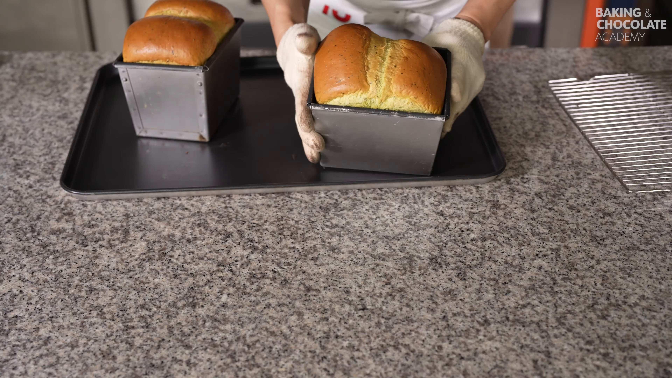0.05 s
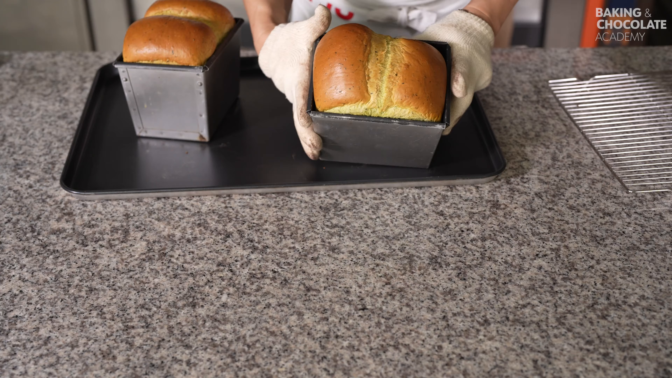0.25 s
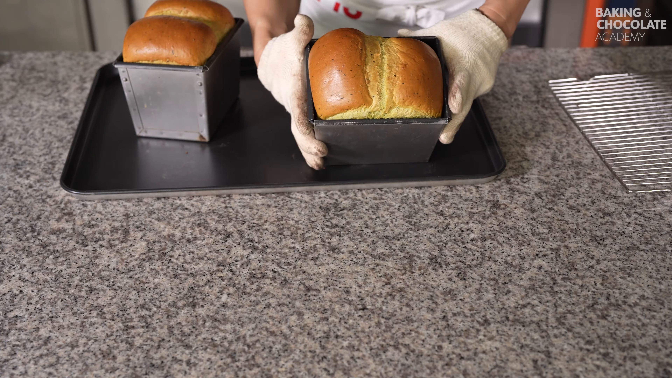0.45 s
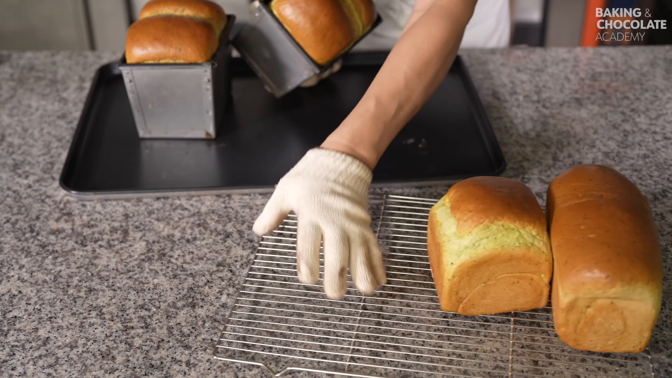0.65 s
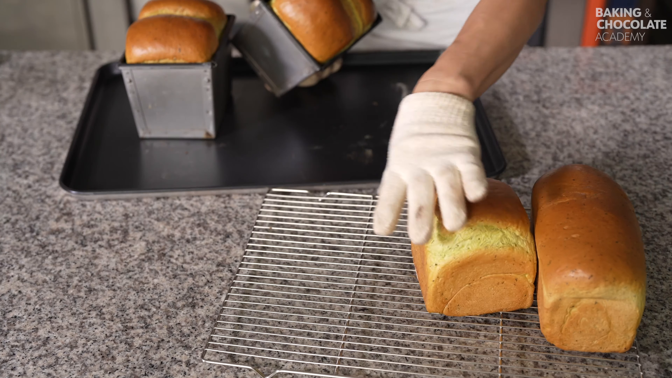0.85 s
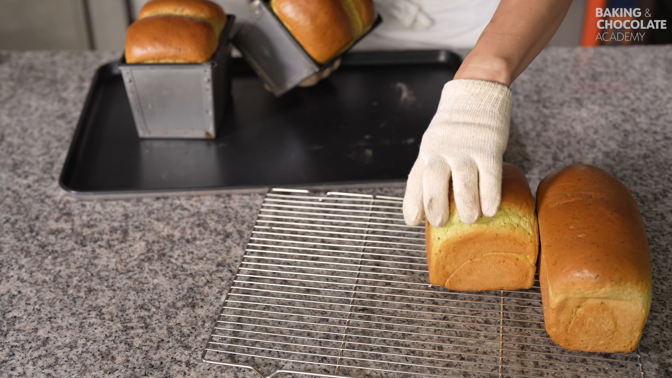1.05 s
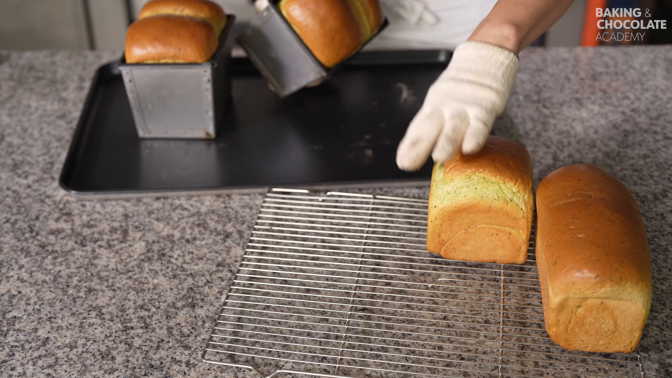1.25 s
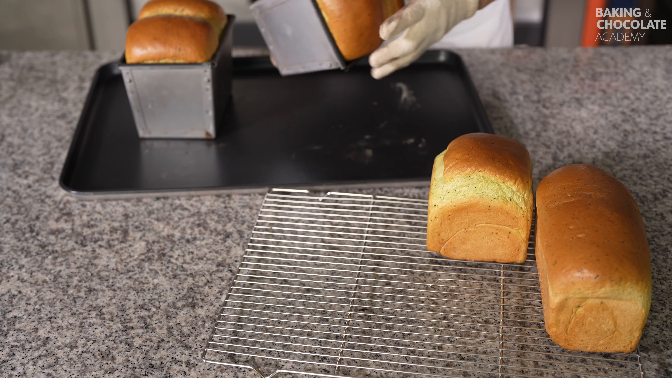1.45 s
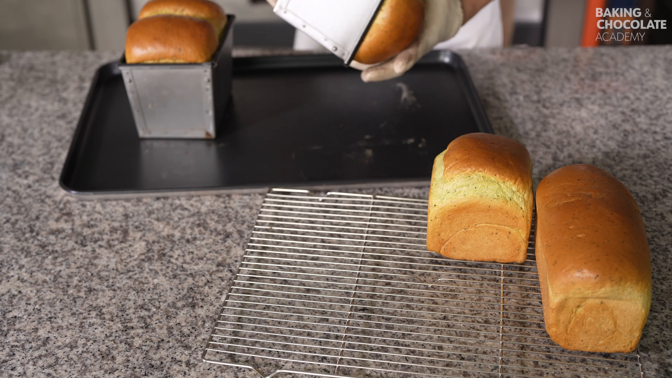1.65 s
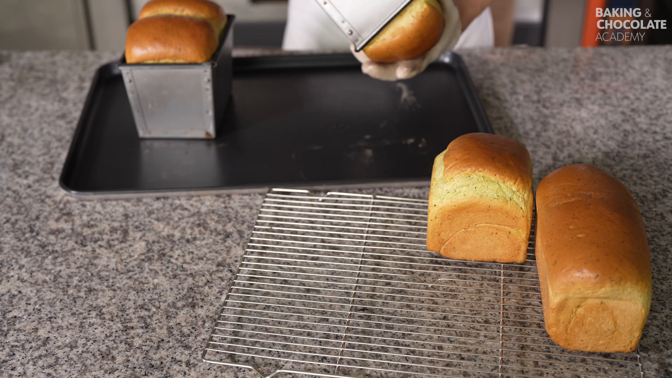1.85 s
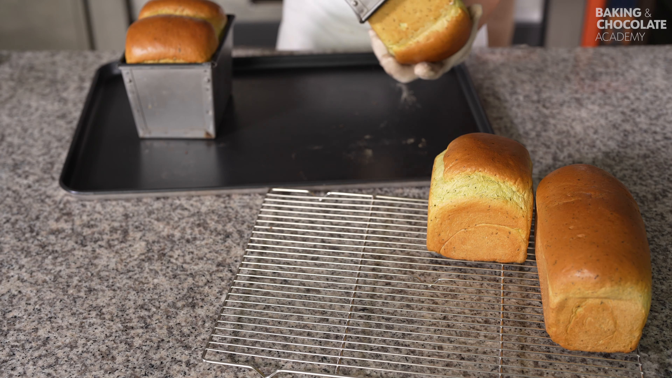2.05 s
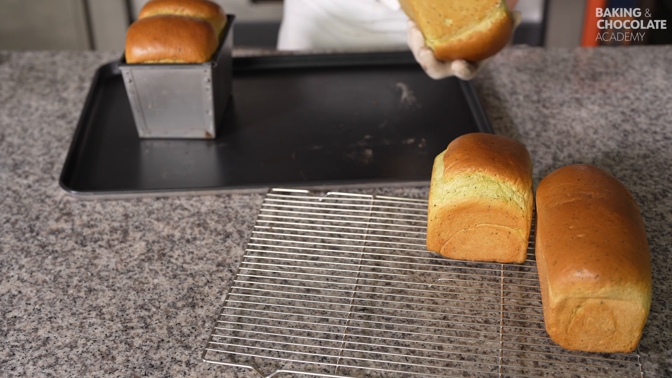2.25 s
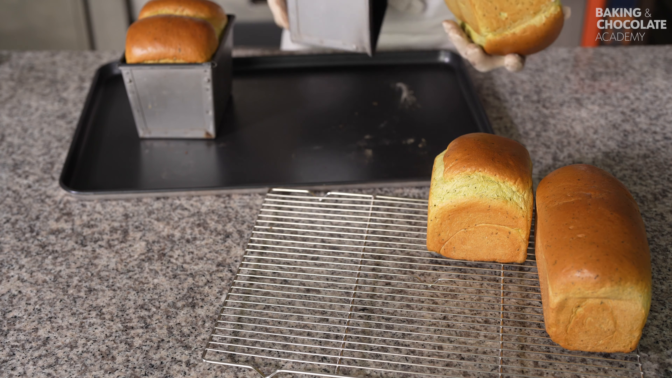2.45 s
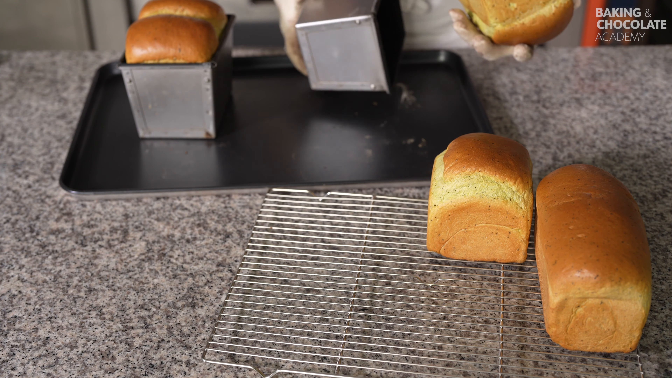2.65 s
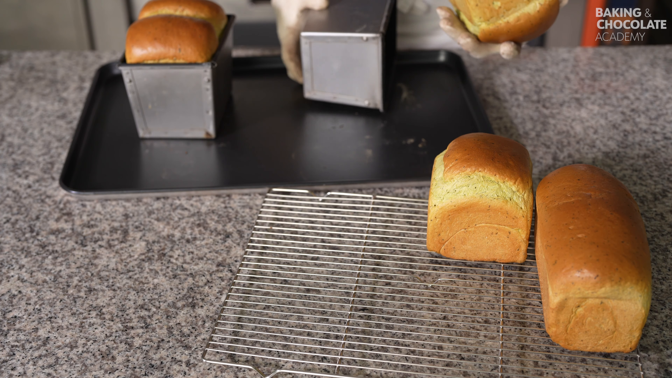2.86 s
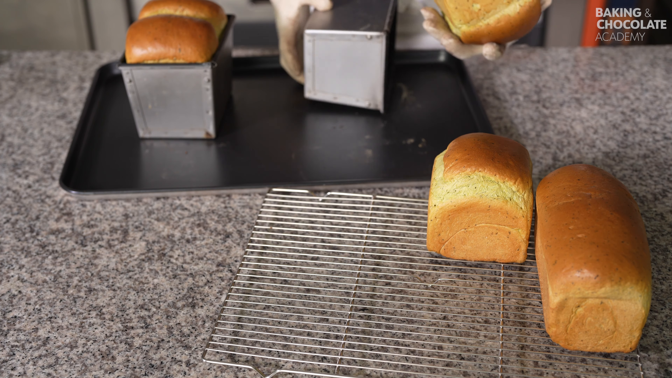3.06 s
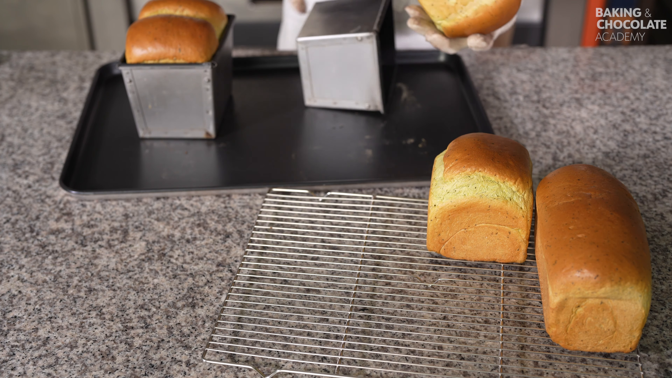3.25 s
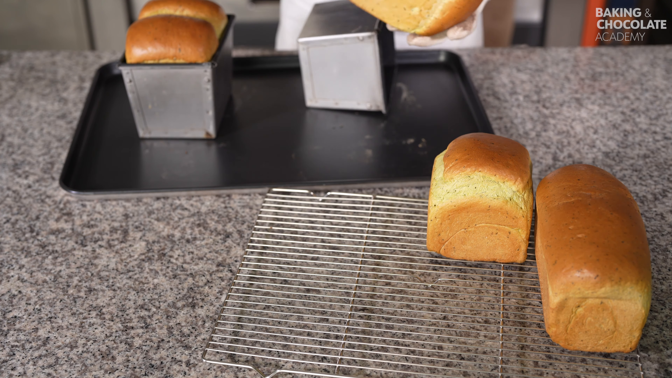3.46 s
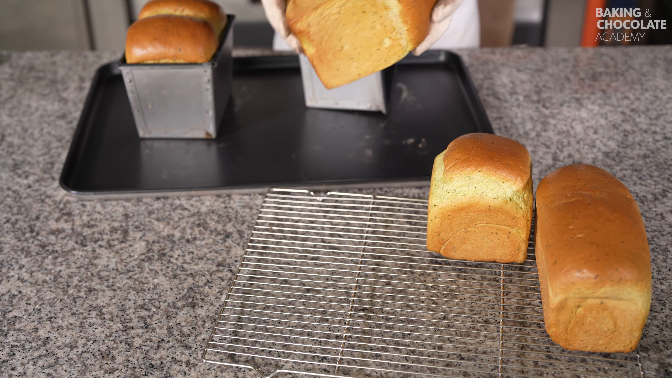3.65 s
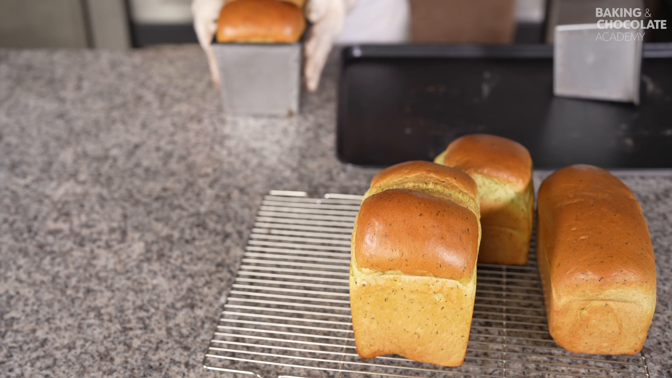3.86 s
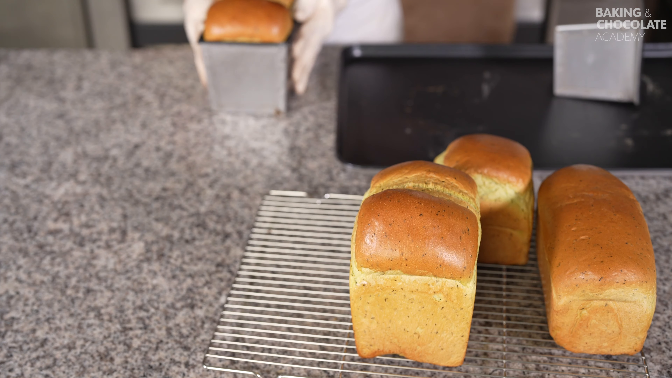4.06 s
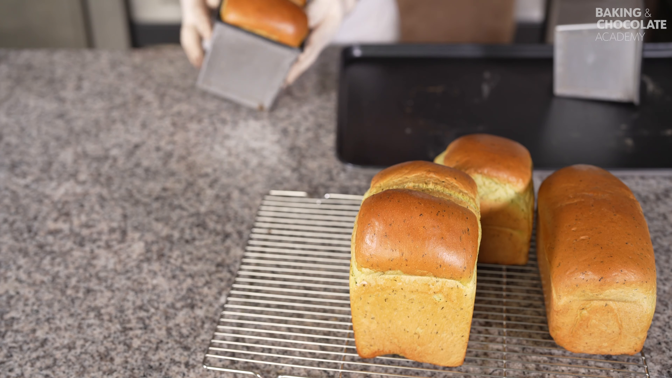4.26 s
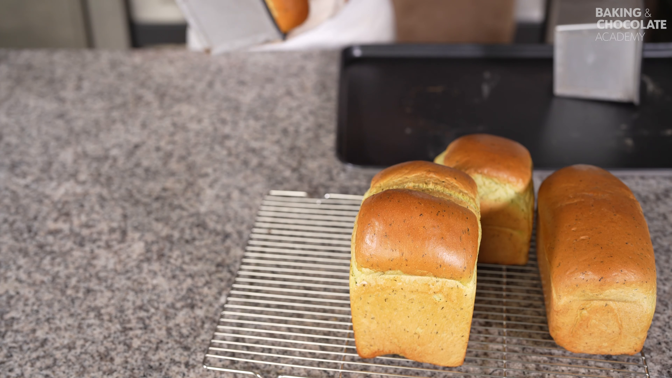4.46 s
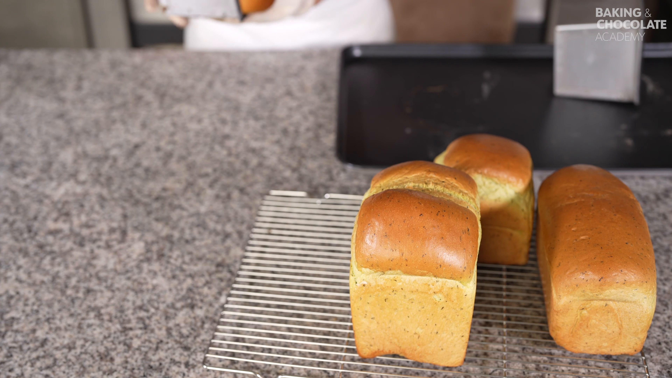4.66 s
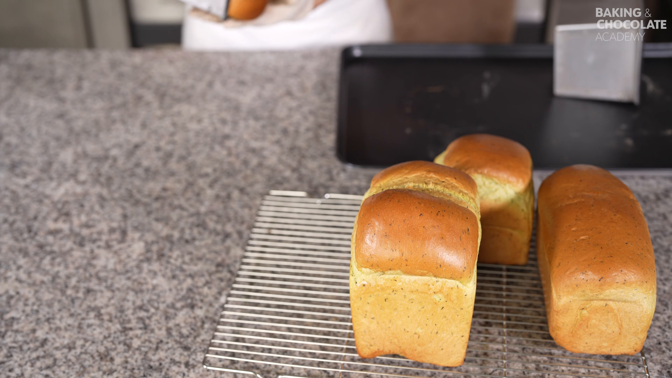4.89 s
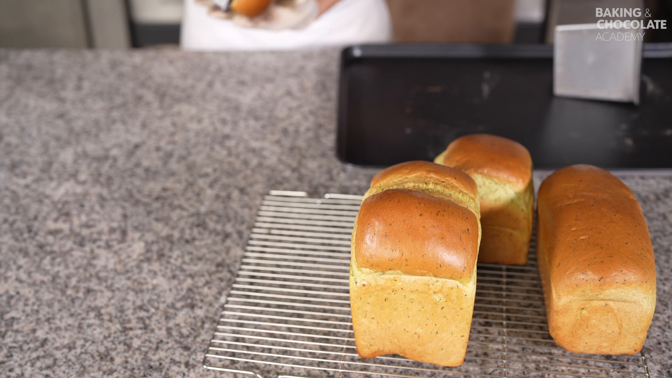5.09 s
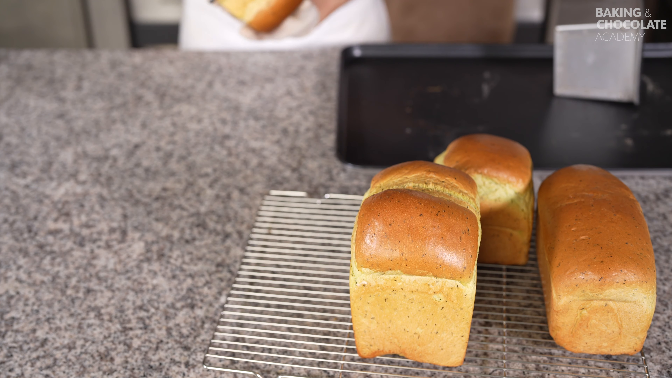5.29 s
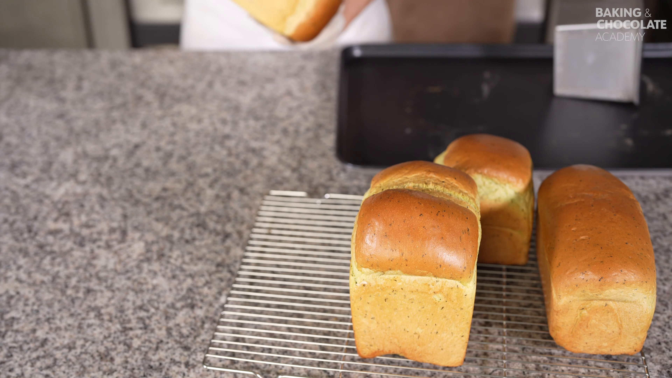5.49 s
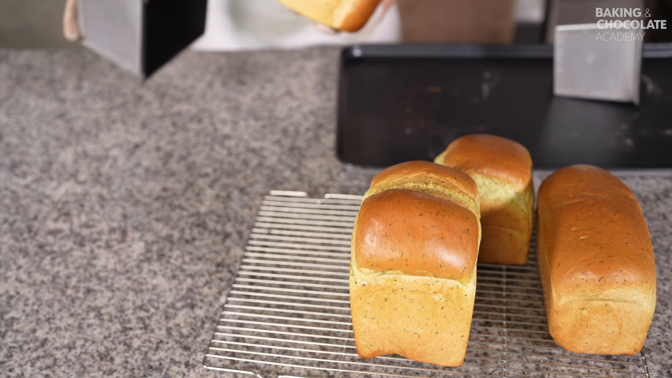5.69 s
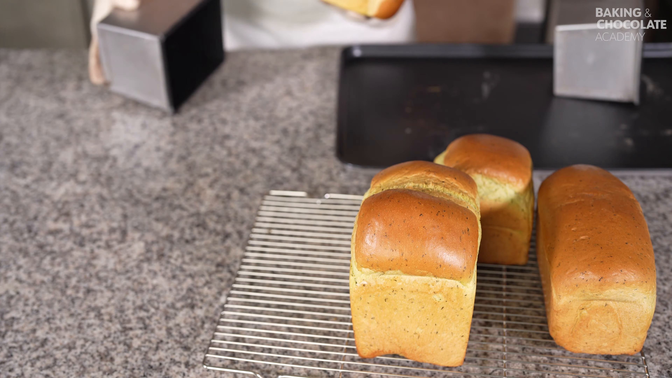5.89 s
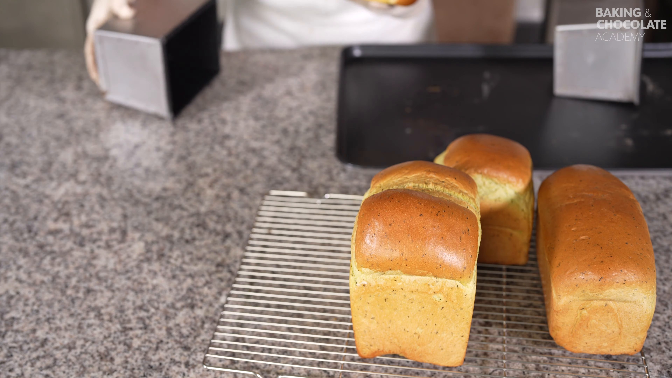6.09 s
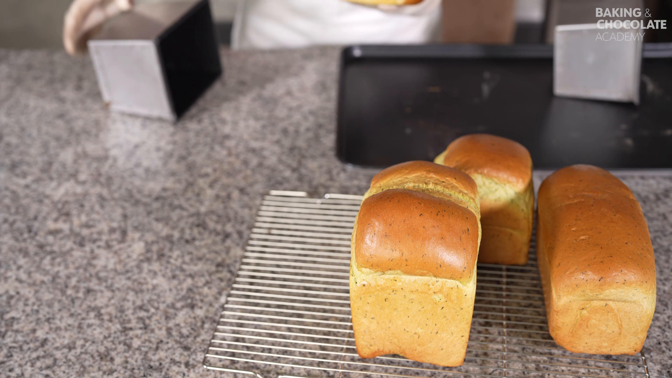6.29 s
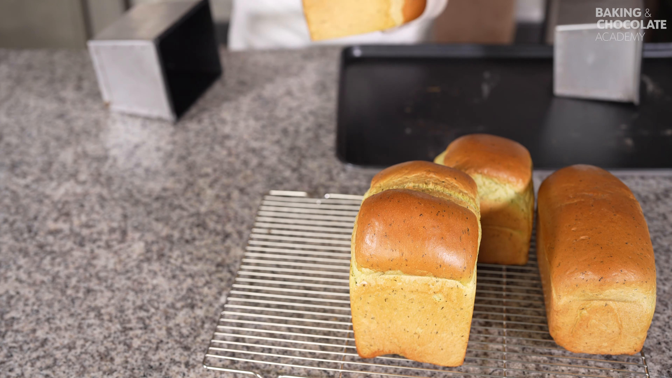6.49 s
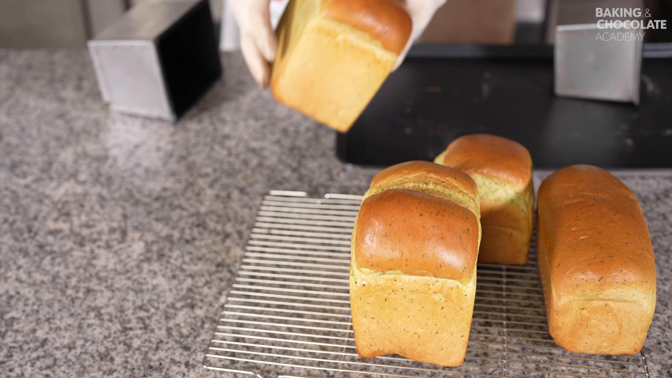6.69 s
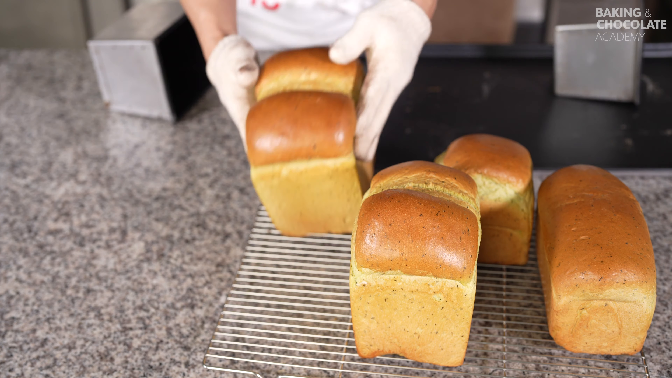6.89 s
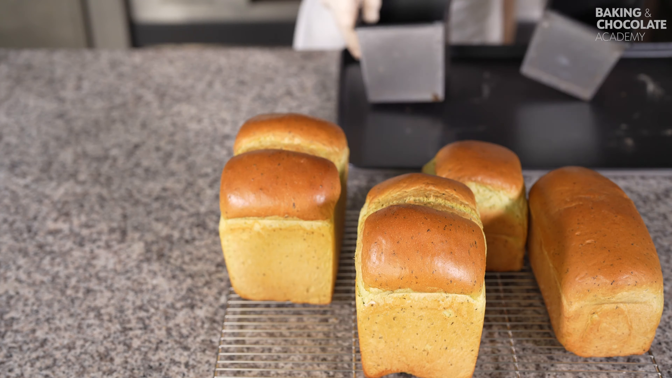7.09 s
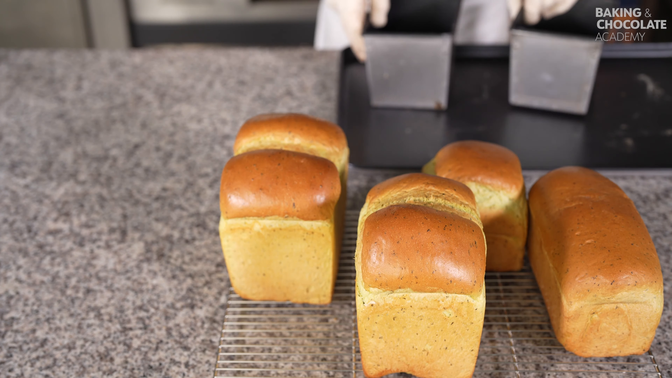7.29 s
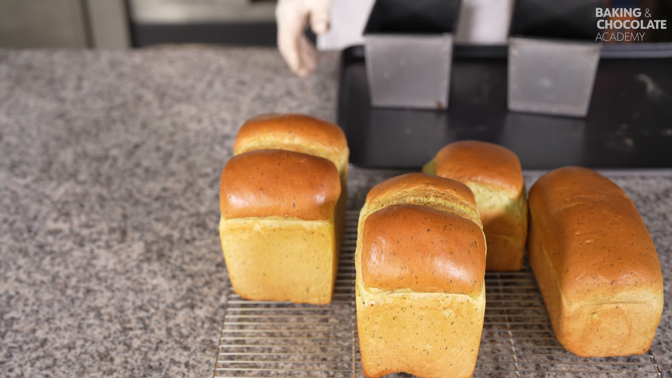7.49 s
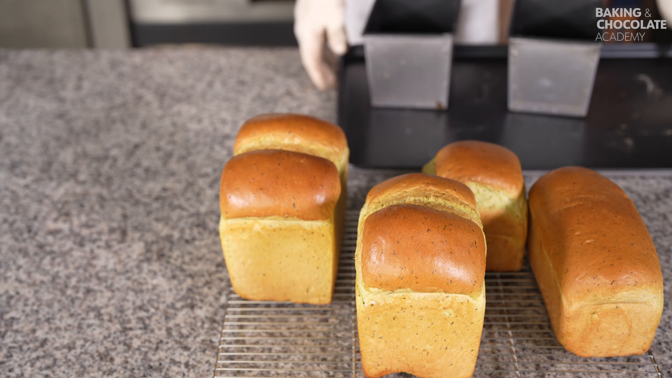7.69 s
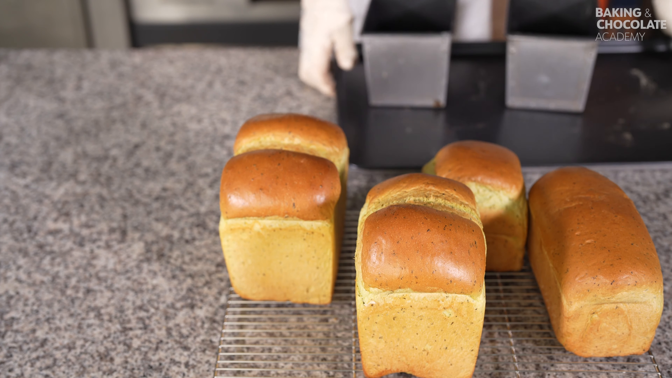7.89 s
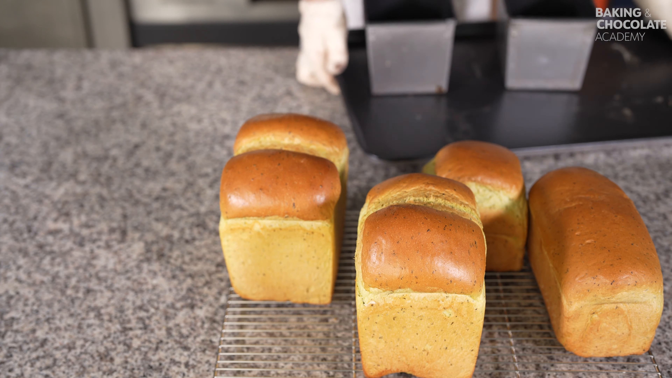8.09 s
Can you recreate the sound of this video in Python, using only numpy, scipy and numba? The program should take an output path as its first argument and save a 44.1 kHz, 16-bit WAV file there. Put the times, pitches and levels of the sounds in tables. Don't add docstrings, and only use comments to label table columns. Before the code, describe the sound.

Sheet-metal loaf pans are banged and knocked on a tray and stone counter in an echoing kitchen, with scrapes, soft glove rustles and ventilation hum.

```python
import sys
import numpy as np
from scipy import signal
from scipy.fft import rfft, irfft, next_fast_len
from scipy.io import wavfile
from scipy.ndimage import uniform_filter1d, minimum_filter1d
from numba import njit

SR = 44100
rng = np.random.default_rng(int(sys.argv[2]) if len(sys.argv) > 2 else 0)


def wav_record(signal):
    frames = np.transpose(np.atleast_2d(signal))
    bounded = np.clip(frames, -1, 1)
    quanta = np.round(bounded * 32767).astype(np.int16)
    wavfile.write(sys.argv[1], SR, quanta)


def field_ratio(decibels):
    return 10 ** (np.asarray(decibels, dtype=float) / 20)


N = 358958
LEAD = 4410

# frequency in Hz, level in dB per Hz.
CRASH_COLOUR = [(53, -56), (90, -9.5), (180, -7.5), (260, -19), (448, 2), (786, -8), (896, -8),
                (2180, -10.5), (2590, -14.5), (8170, -27.5), (16000, -39.5)]


def table(rows, hz):
    f, v = np.transpose(rows)
    return np.interp(np.log(np.maximum(hz, 1)), np.log(f), v)


def noise(rows, size):
    white = rfft(rng.standard_normal(size))
    x = irfft(white * field_ratio(table(rows, np.fft.rfftfreq(size, 1 / SR))), size)
    return x / x.std()


def pair(rows, size):
    # frequency in Hz, correlation of left and right (-1 to 1).
    coherence = [(150, 1), (220, .995), (350, 0.93), (700, 0.62), (1400, 0.49), (2800, -0.16),
                 (6000, -0.091), (14000, -0.055)]
    hz = np.fft.rfftfreq(size, 1 / SR)
    like = np.clip(table(coherence, hz), -1, 1)
    white = rfft(rng.standard_normal((2, size)))
    mid, side = white * np.sqrt([1 + like, 1 - like]) * field_ratio(table(rows, hz))
    x = irfft(np.array([mid + side, mid - side]), size)
    return x / x.std()


def walk(rate):
    hold = int(SR / rate)
    steps = np.repeat(rng.standard_normal(N // hold + 1), hold)
    return 1.3 * uniform_filter1d(uniform_filter1d(steps, hold), hold)[:N]


def add(bus, s, x):
    i = int(s * SR) + LEAD
    bus[:, i:i + x.shape[1]] += x[:, :bus.shape[1] - i]


def blow(rows, size):
    cepstrum = irfft(np.log(field_ratio(table(rows, np.fft.rfftfreq(size, 1 / SR)))), size)
    cepstrum[1:size // 2] = 2 * cepstrum[1:size // 2]
    cepstrum[size // 2 + 1:] = 0
    x = irfft(np.exp(rfft(cepstrum)), size)
    return x / np.linalg.norm(x)


def strokes(rows):
    t = np.arange(N) / SR
    return sum(field_ratio(db - 20 * np.maximum((s - t) / rise_s, (t - s) / fall_s))
               for s, db, rise_s, fall_s in rows)


def knocks(events, modes, colour, ring_s, dense_s, dense_db, near_db, crack_db, body_rise_s, top_rise_s,
           edge_db):
    tone_hz = (480, 1200, 2700, 8000)
    bus, t = np.zeros((2, N + LEAD)), np.arange(16384) / SR
    hz, mode_db = np.transpose(modes)
    for s, force_db, body_db, treble_db in events:
        tilt = list(zip(tone_hz, (body_db, 0, 0, treble_db)))
        strength = field_ratio(mode_db + table(tilt, hz) + 1.5 * rng.standard_normal(len(hz)))
        t60 = ring_s * (hz / 500) ** -.3
        twin_hz = hz + rng.uniform(16.8, 34.7, len(hz)) * rng.choice([-1, 1], len(hz))
        waves = np.sin(2 * np.pi * np.outer(hz, t)) + 0.51 * np.sin(2 * np.pi * np.outer(twin_hz, t))
        ring = (strength / np.sqrt(t60)) @ (waves * field_ratio(-60 * t / t60[:, None]))
        ring = ring / np.linalg.norm(ring)

        shade = [(f, table(colour, f) + table(tilt, f)) for f in 40 * 2 ** np.arange(0, 9, .25)]
        cloud = noise(shade, len(t)) * field_ratio(-60 * t / dense_s)
        cloud = cloud / np.linalg.norm(cloud)
        crack = blow(shade, len(t))
        near = ring * (1 - np.exp(-t / 0.002))
        near = near + field_ratio(dense_db) * (0.26 * field_ratio(crack_db) * crack + cloud)

        body = signal.sosfilt(signal.butter(2, 1350, fs=SR, output="sos"), near)
        edge = (near - body) * field_ratio(edge_db)
        near = body * (1 - np.exp(-t / body_rise_s)) + edge * (1 - np.exp(-(t + 1 / SR) / top_rise_s))
        far = 0.7 * ring + field_ratio(dense_db) * crack
        both = np.array([field_ratio(near_db) * near, far]) / np.linalg.norm(near)
        add(bus, s, both * field_ratio(force_db + 15.5))
    return bus


def banged_pans():
    # start in s, force in dB, body tilt in dB, treble tilt in dB.
    crashes = [(-0.03, -1, 0, 4), (3.205, 5, -1, 6), (3.211, -8, -3, -2), (3.262, -8, 1, -10),
               (3.317, -10, -3, -14), (7.116, -22, -3, -5), (7.145, -13.5, 0, 3.5), (7.254, -16, 0, 6),
               (7.325, -24, 8, -2), (7.355, -20, 10, -6), (7.368, -16, -2, 6), (7.452, -8.5, 7, -10),
               (7.461, -8.5, 11, -9), (7.473, -6.5, -5.5, -4), (7.488, -15, -10, -4), (7.503, -18, 0, -8)]
    # wall mode in Hz, level in dB.
    crash_modes = [(387.6, -18), (452.2, -20.5), (656.8, -27), (1459, -59), (1534, -64), (1593, -41),
                   (2143, -40), (2509, -66), (2632, -72), (2988, -45)]
    bus = knocks(crashes[:5], crash_modes, CRASH_COLOUR, ring_s=0.15, dense_s=0.11, dense_db=4.5,
                 near_db=-1, crack_db=8, body_rise_s=0.0016, top_rise_s=.0001, edge_db=2.5)
    bus = bus + knocks(crashes[5:11], crash_modes, CRASH_COLOUR, ring_s=0.14, dense_s=0.09, dense_db=2.0,
                       near_db=-0.5, crack_db=-6, body_rise_s=0.0036, top_rise_s=.0008, edge_db=0.5)
    return bus + knocks(crashes[11:], crash_modes, CRASH_COLOUR, ring_s=0.4, dense_s=0.096, dense_db=5.0,
                        near_db=0.5, crack_db=8.5, body_rise_s=0.00046, top_rise_s=0.00039, edge_db=2.0)


def loaded_pan():
    # start in s, force in dB, body tilt in dB, treble tilt in dB.
    full_blows = [
        (3.876, 6, -1, -1.5),
        (3.925, -4, -3, -6),
        (3.956, -4.5, -1, -1),
        (4.099, -6, 6.5, 7),
        (4.107, 1, -2.5, 3),
        (4.153, -6, 0, 3),
        (4.19, -8, 0, -1),
        (4.237, -7.5, -4.5, -5),
    ]
    # wall mode in Hz, level in dB.
    full_modes = [(382.2, -53), (419.9, -13.5), (613.7, -23), (726.7, -20), (1061, -32), (1276, -52),
                  (1346, -39), (1453, -23), (1728, -56), (1782, -49), (2083, -33), (4250, -48)]
    # frequency in Hz, level in dB per Hz.
    full_colour = [(53, -43), (90, -25), (117, -20), (192, -12.5), (737, -2.5), (839, -5.5), (1470, -5),
                   (2130, -9), (2900, -17.5), (3590, -25), (9930, -27.5), (16000, -36)]
    bus = knocks(full_blows[:3], full_modes, full_colour, ring_s=0.24, dense_s=0.015, dense_db=8.5,
                 near_db=-9.0, crack_db=-12, body_rise_s=.001, top_rise_s=.002, edge_db=-1.0)
    return bus + knocks(full_blows[3:], full_modes, full_colour, ring_s=0.48, dense_s=0.036, dense_db=6.0,
                        near_db=1.1, crack_db=-6, body_rise_s=.001, top_rise_s=0.00026, edge_db=1.5)


def empty_pan():
    # start in s, force in dB, body tilt in dB, treble tilt in dB.
    empty_blows = [
        (5.913, -6, -3, 6),
        (5.923, -10.5, 1, 5),
        (5.979, -7, -3, 5),
        (6.0, -9.5, 11, 8),
        (6.143, -2, 2.5, -7),
        (6.159, -7.5, 2, 13),
        (6.208, -13, 14, -17),
        (6.279, 6.5, 3, 3.5),
        (6.327, -1.5, 8, 8.5),
        (6.385, -5, 2.5, -9),
    ]
    # wall mode in Hz, level in dB.
    empty_modes = [(372.7, -23.5), (470, -22.5), (583, -28.5), (502, -28), (659, -27.5), (820, -40),
                   (952, -37), (1170, -63), (1375, -36.5), (1820, -43), (527, -40), (2116, -43),
                   (2600, -37), (2700, -58), (2920, -37), (3400, -35), (3811, -56), (4172, -51)]
    side_modes = [(333.8, -26), (382.2, -48), (468.3, -21.5), (581.4, -17.5), (667.5, -30), (855.9, -19),
                  (1066, -22), (1206, -29), (1453, -56), (1530, -15), (1787, -36), (2105, -23),
                  (2320, -17.5), (2519, -29), (2907, -50), (3203, -27), (3343, -28), (4172, -32)]
    # frequency in Hz, level in dB per Hz.
    empty_colour = [(53, -84), (90, -34), (278, -20), (467, -5.5), (676, -15), (753, -51), (935, -18.5),
                    (2130, -15), (2900, -15.5), (10100, -27), (16000, -32.5)]
    side_colour = [(53, -67), (90, -48), (260, -21), (376, -8), (410, -14), (581, -3), (721, -8),
                   (1510, -3.5), (4450, -20.5), (16000, -30.5)]
    bus = knocks(empty_blows[:7], empty_modes, empty_colour, ring_s=0.68, dense_s=0.069, dense_db=-4.0,
                 near_db=-0.5, crack_db=-13, body_rise_s=.004, top_rise_s=0.0011, edge_db=1.3)
    return bus + knocks(empty_blows[7:], side_modes, side_colour, ring_s=0.3, dense_s=0.05, dense_db=1.0,
                        near_db=-2, crack_db=-8, body_rise_s=.002, top_rise_s=0.00083, edge_db=1.0)


def tray_taps():
    # start in s, force in dB, body tilt in dB (flat landing), treble tilt in dB (hard edge).
    taps = [
        (0.7487, -6.5, -1.5, 7),
        (2.907, -10.5, 3.5, 2),
        (2.963, -20.5, 10, -10),
        (2.991, -13, 0, 1.5),
        (3.0, -12.5, 6.5, -8),
        (3.058, -25.5, 1, -13),
    ]
    # wall mode in Hz, level in dB.
    rack_modes = [(384, -27), (474, -25.5), (620, -61), (920, -36), (1010, -38), (1507, -35.5), (1880, -43),
                  (2640, -53), (2780, -50), (2850, -43), (3180, -44), (4086, -64), (3900, -51), (420, -54)]
    tray_modes = [(473, -27.5), (597.5, -59), (715, -41), (930, -36), (1040, -36), (1210, -43), (1475, -38),
                  (1660, -42), (505, -37), (2220, -45)]
    # frequency in Hz, level in dB per Hz.
    tray_colour = [(53, -18), (90, -29), (296, -27.5), (478, -3.5), (556, -12), (593, -12.5), (1110, -19.5),
                   (1440, -15.5), (3510, -21.5), (8350, -23.5), (16000, -38)]
    bus = knocks(taps[:1], rack_modes, CRASH_COLOUR, ring_s=0.41, dense_s=0.054, dense_db=1.0,
                 near_db=-0.5, crack_db=-11, body_rise_s=0.0043, top_rise_s=0.00053, edge_db=2)
    return bus + knocks(taps[1:], tray_modes, tray_colour, ring_s=0.11, dense_s=0.069, dense_db=-0.5,
                        near_db=1.5, crack_db=-6, body_rise_s=0.0025, top_rise_s=.0003, edge_db=2.5)


def rings():
    # start in s, level in dB, frequency in Hz, ring time in s, stilled after s.
    wall_rings = [(.752, -21, 440, .35, .2), (2.908, -21.5, 460, 0.14, .06), (2.997, -23, 470, 0.14, .06),
                  (3.095, -32, 470, 0.23, 0.059), (4.151, -44, 4255, 0.78, 0.37),
                  (4.17, -30, 1477, 0.6, .3), (3.89, -28, 1152, .8, .15), (3.92, -29, 1870, .6, .12),
                  (5.917, -21.5, 470, .78, .17), (5.92, -25.5, 371, 0.77, 0.21),
                  (5.92, -29.5, 590, 0.88, .17), (5.92, -33, 668, 0.72, .18), (5.92, -34.5, 2116, 0.7, .19),
                  (5.92, -42, 1414, 0.94, .19), (6.146, -21.5, 486, 0.8, 0.21),
                  (6.146, -23.5, 371.7, 0.6, 0.17), (6.16, -26.5, 668, 0.97, .12),
                  (6.16, -30, 598, .8, 0.098), (6.16, -35, 1375, 0.88, 0.097), (6.3, -24, 374.4, 0.73, .2),
                  (6.33, -30, 585, 0.8, .22), (6.354, -18, 1522, .5, 0.079), (6.52, -32, 1515, 0.4, .22),
                  (6.4, -26.5, 383.6, .6, 0.16), (6.3, -27.5, 856, 1.2, 0.4), (6.5, -35, 1415, 0.75, .22),
                  (6.3, -31, 2315, .6, .3)]
    bus, t = np.zeros((2, N + LEAD)), np.arange(24576) / SR
    for s, db, hz, ring_s, stilled_s in wall_rings:
        shape = field_ratio(db - 60 * t / ring_s) * (1 - np.exp(-t / 0.0065))
        shape = shape * np.exp(-np.maximum(t - stilled_s, 0) / 0.018)
        rough = .3 + hz / 2500
        waver = field_ratio(rough * 3 * walk(34)[:len(t)])
        phase = rough * walk(26)[:len(t)]
        tone = 2 * shape * waver * np.sin(2 * np.pi * hz * t + phase)
        add(bus, s, np.array([tone, 0.1 * tone]))
    return bus


def thuds():
    # start in s, level in dB, frequency in Hz, ring time in s.
    flexures = [
        (7.148, -26.5, 170, 0.067),
        (7.318, -27.5, 173, 0.075),
        (7.352, -23, 144, 0.065),
        (4.1, -24, 147, 0.053),
        (7.3, -39, 800, .3),
        (6, -34, 720, 0.17),
        (6.4, -26.5, 310, 0.26),
        (8.4, -13, 370, 0.08),
        (7.455, -14, 500, .06),
        (7.46, -19, 720, .04),
    ]
    bus, t = np.zeros((2, N + LEAD)), np.arange(8192) / SR
    for s, db, hz, ring_s in flexures:
        boom = 2 * np.sin(2 * np.pi * hz * t) * field_ratio(db - 60 * t / ring_s) * (1 - np.exp(-t / 0.0038))
        add(bus, s, np.array([boom, 0.21 * boom]))
    return bus


def ticks():
    # start in s, peak in dB, then three ring frequencies in Hz.
    touches = [(.577, -32, 10500, 12000, 14000), (1.564, -47, 950, 3170, 7740),
               (1.764, -33, 1780, 3350, 7600), (1.874, -44, 1450, 4250, 7660),
               (1.889, -49, 970, 3170, 7150), (2.169, -36, 2080, 3200, 7850),
               (4.687, -43, 1450, 2670, 7740), (4.83, -37, 1500, 3340, 7200),
               (4.903, -37, 1570, 2580, 7260), (4.976, -35, 1440, 3140, 6800),
               (5.179, -34, 851, 2630, 7740), (5.617, -35, 2160, 4010, 7260),
               (5.72, -26, 2150, 2820, 10000), (5.764, -26, 2240, 3330, 9500),
               (5.773, -26, 2880, 3400, 9400), (6.804, -35, 1060, 2830, 7300),
               (7.819, -34, 880, 3137, 8830), (7.983, -28, 880, 3760, 7700)]
    bus, t = np.zeros((2, N + LEAD)), np.arange(2048) / SR
    for s, peak_db, *hz in touches:
        t60 = np.array([.06, .05, .04]) * np.minimum(1, 6500 / np.array(hz)) ** 3
        waves = np.sin(2 * np.pi * np.outer(hz, t)) * field_ratio(-60 * t / t60[:, None])
        ring = np.array([.8, .8, .6]) @ waves
        click = noise([(1000, -30), (2200, 4), (5000, -7), (14000, -4)], len(t)) * field_ratio(-60 * t / 0.012)
        both = np.array([0.28 * ring + 0.85 * click, 0.07 * ring + 0.45 * click])
        add(bus, s, field_ratio(peak_db - 5) * both)
    return bus


def slides():
    # peak in s, level in dB, rise in s, fall in s, low wall level in dB.
    drags = [
        (.62, -46.5, 0.027, 0.36, 5),
        (1.065, -30.5, 0.042, 0.12, -11),
        (1.175, -31.5, 0.07, 0.17, -8),
        (1.27, -43.5, 0.08, 0.14, 1.5),
        (1.225, -40.5, .04, 0.066, -9),
        (3.68, -46, 0.092, 0.12, -10.5),
        (7.09, -36.5, 0.047, 0.076, -2),
        (7.159, -26.5, 0.08, 0.76, 1.5),
        (7.37, -39.5, 0.055, 0.28, 14),
        (7.98, -33, 0.085, 0.27, -27),
    ]
    grit = field_ratio(1.8 * walk(60))
    upper = noise([(500, -2.5), (900, 10.0), (2200, 6.0), (3500, -0.5), (6000, -16), (16000, -19)], N)
    walls = noise([(150, -43.0), (330, -3.5), (480, -4.5), (700, -3.0), (1000, -46)], N)
    scrape = strokes([row[:4] for row in drags])
    shake = strokes([(s, db + wall_db, rise_s, fall_s) for s, db, rise_s, fall_s, wall_db in drags])
    slide = field_ratio(-7.0) * grit * (scrape * upper + shake * walls)
    return np.pad([slide, .45 * slide], ((0, 0), (LEAD, 0)))


def gloves():
    # peak in s, level in dB.
    flicks = [(.615, -51), (.95, -56), (1.22, -44), (1.58, -40), (1.874, -44), (2.176, -46), (3.606, -46),
              (5.618, -44), (5.72, -38.5), (5.77, -42), (6.804, -43.5)]
    # peak in s, level in dB, length in s, fine dry hiss in dB.
    sweeps = [(0.71, -49, 0.56, -14), (1.1, -41.5, 0.45, -0.5), (1.268, -52.5, 0.23, 5),
              (1.72, -48.5, 0.16, -12), (1.98, -44.5, 0.62, -5), (3.537, -44.5, 0.47, -8),
              (3.71, -48.5, 0.32, -11), (4.535, -51.5, 0.33, -25), (4.853, -54.5, 0.4, -25),
              (4.957, -54, 0.27, -26), (5.12, -46.5, 0.23, -20), (5.32, -51.5, 0.35, -25),
              (5.48, -52, 0.28, -25), (6.972, -48.5, 0.4, -4), (7.144, -52, .3, -14), (7.28, -62, .4, -16),
              (7.35, -34.5, 0.13, -5), (7.787, -64, 0.28, -12), (7.939, -41, 0.07, -10),
              (7.995, -29.5, 0.34, -3.5)]
    # frequency in Hz, level in dB per Hz.
    brush_colour = [(1470, -32), (2500, 0.5), (3770, -6.5), (6200, -4.5), (7890, -1), (10000, -3),
                    (15200, -17), (16000, -10)]
    rise_share, fall_share = 0.41, 1 - 0.41
    rubs = [(s, db, 0.0092, 0.063) for s, db in flicks]
    rubs += [(s, db, rise_share * long_s, fall_share * long_s) for s, db, long_s, _ in sweeps]
    fine = strokes([(s, db + fine_db, rise_share * long_s, fall_share * long_s)
                    for s, db, long_s, fine_db in sweeps])
    brush = strokes(rubs) * noise([(1200, -6.5)] + brush_colour[1:], N)
    brush = brush + fine * noise([(9000, -23), (12500, -1), (15500, -1)], N)
    brush = brush * field_ratio(-4.0 + 0.78 * walk(90))
    return np.pad([brush, .3 * brush], ((0, 0), (LEAD, 0)))


def kitchen(near, far, wet_db):
    # frequency in Hz, 60 dB decay time in s.
    room_t60 = [(100, 0.49), (300, 0.69), (1000, 0.94), (3000, 0.81), (8000, 0.67), (16000, 0.31)]
    t, tail = np.arange(SR) / SR, 0
    for hz in 60 * 2 ** np.arange(0, 8.1, .5):
        band = pair([(hz / 1.74, -60), (hz / 1.357, -6), (hz, 0), (hz * 1.33, -6), (hz * 1.96, -60)], SR)
        band = band * field_ratio(-60 * t / table(room_t60, hz)) * (1 - np.exp(-t / 0.004))
        tail = tail + band * np.sqrt(hz) / np.linalg.norm(band)
    tail = tail / np.linalg.norm(tail) * field_ratio(wet_db)
    ports = np.array([[1, 0.012, 0.13, -0.063], [1, 0.18, 0, 0.0023]])
    direct = signal.fftconvolve(near[None], ports, axes=1)[:, LEAD:LEAD + N]
    return direct + signal.fftconvolve(far[None], tail, axes=1)[:, LEAD:LEAD + N]


def background():
    # start in s, air in dB, motor in dB, hiss in dB, top hiss in dB.
    shots = [
        (0, -0.5, -9.5, 12, -10),
        (0.605, 5, 1.5, 3, 1),
        (3.872, -2, -7, 12.5, -14),
        (7.08, 0.5, 1, -5, 0.1),
    ]
    # frequency in Hz, level in dB per Hz.
    air_colour = [(12, -39), (20, -7), (48, -0.5), (75, -6.5), (100, -13), (120, -10), (146, -7.5),
                  (172, -6), (301, -5), (347, -10), (377, -3), (410, -8.5), (1570, -16), (2910, -23),
                  (3250, -24.5), (3530, -30), (16000, -41.5)]
    # frequency in Hz, level in dB.
    hum_lines = [(64.6, -56), (118.4, -52.5), (177.6, -51.5), (355.3, -55.5), (409.1, -61.5), (468.3, -59)]
    whine_lines = [(3235, -64.5), (8829, -72)]
    t, air = np.arange(N) / SR, 0
    starts, air_db, motor_db, hiss_db, top_db = np.transpose(shots)
    shot = np.searchsorted(starts, t, side="right") - 1
    for hz in 25 * 2 ** np.arange(0, 9.5, 1.):
        ratio = 2 ** np.linspace(-.9, .9, 13)
        shape = table(air_colour, ratio * hz) + 20 * np.log10(np.cos(np.log2(ratio) * np.pi / 2))
        drift_db = .9 * walk(4) + hiss_db[shot] * hz / 8000 + top_db[shot] * (hz > 10000)
        band = pair(list(zip(ratio * hz, shape)) + [(2 * hz, -120)], N)
        air = air + band * field_ratio(drift_db) * np.sqrt(hz * np.mean(field_ratio(shape) ** 2))
    motor = 0
    for hz, db in hum_lines:
        swell = field_ratio(db + 3 + 1.6 * walk(9))
        motor = motor + swell * np.sin(2 * np.pi * hz * t + .7 * walk(5 + hz / 40))
    for hz, db in whine_lines:
        swell = field_ratio(db + 2 * walk(17))
        motor = motor + swell * np.sin(2 * np.pi * hz * t + 1.6 * walk(30))
    return air / air.std() * field_ratio(-48.5 + air_db[shot]) + motor * field_ratio(motor_db[shot])


def scene():
    # frequency in Hz, left minus right in dB.
    left_colour = [(120, -1.5), (250, 0.6), (600, -0.3), (2500, -1), (5000, -0.1), (9000, -5),
                   (13000, -1.3)]
    thin = tray_taps() + banged_pans() + loaded_pan() + empty_pan() + ticks() + slides() + gloves()
    thin = signal.sosfilt(signal.butter(3, 130, "high", fs=SR, output="sos"), thin)
    room = kitchen(*(thin + thuds() + rings()), wet_db=9.5)
    size = next_fast_len(N)
    lean = table(left_colour, np.fft.rfftfreq(size, 1 / SR)) / 2
    room = irfft(rfft(room, size) * field_ratio([lean, -lean]), size)[:, :N]
    return room + background()


@njit
def follow(x, attack, release):
    e, y = 0., np.empty(len(x))
    for i in range(len(x)):
        e += (x[i] - e) * (attack if x[i] > e else release)
        y[i] = e
    return y


def band_limit(x):
    return signal.sosfilt(signal.butter(12, 16660, fs=SR, output="sos"), x)


def record(dry):
    dry = signal.sosfilt(signal.ellip(8, .2, 60, 15950, fs=SR, output="sos"), dry)
    env = follow(np.abs(dry).max(axis=0), 1., 1 / (.075 * SR))
    gain = np.minimum(1, field_ratio(-4.5) / (env + 1e-9)) ** 0.96
    gain = uniform_filter1d(minimum_filter1d(gain, size=120), size=60)
    ceiling = .78
    return band_limit(np.clip(dry * gain, -ceiling, ceiling))


dry = scene()
out = record(dry)
wav_record(out)
```